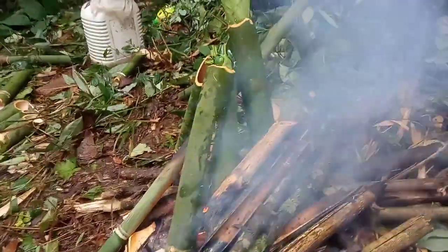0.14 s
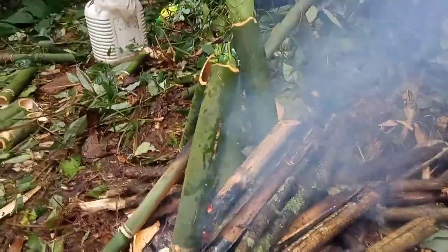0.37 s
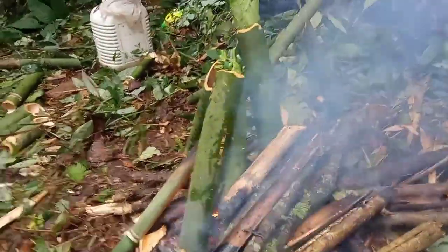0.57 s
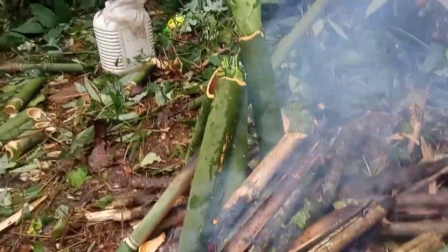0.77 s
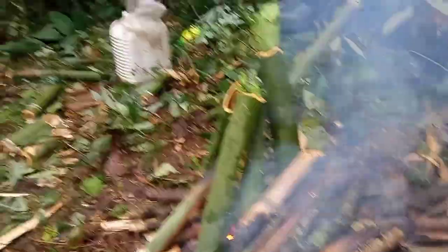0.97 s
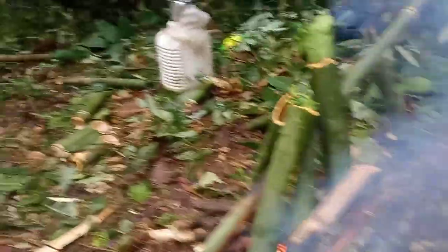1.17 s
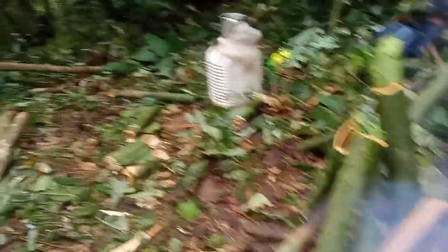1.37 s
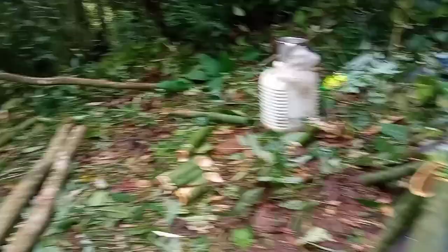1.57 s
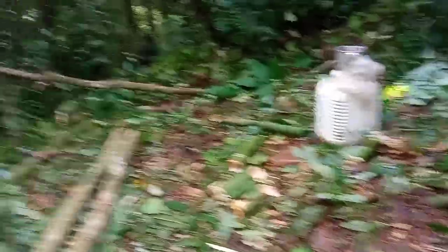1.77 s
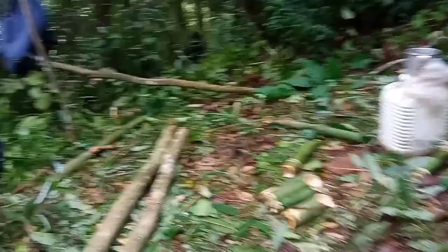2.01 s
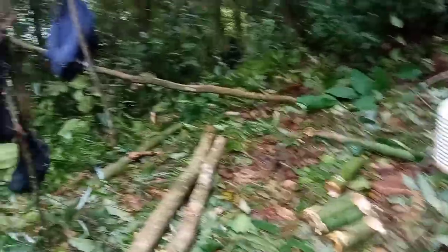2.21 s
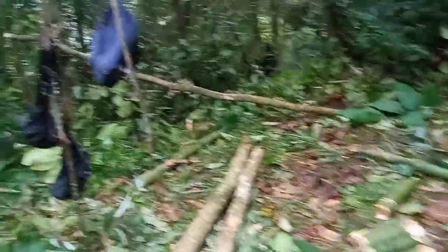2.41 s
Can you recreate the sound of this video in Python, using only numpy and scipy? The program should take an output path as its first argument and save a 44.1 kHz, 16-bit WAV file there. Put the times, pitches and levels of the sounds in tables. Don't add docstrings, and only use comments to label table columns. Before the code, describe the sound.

Bamboo pops loudly in a campfire twice, about a second apart, with short woodland echoes; soft hissing and low flame flutter continue, and smaller cracks, knocks and steam puffs crowd the end, close and slightly saturated.

```python
import sys
import numpy as np
from scipy import signal
from scipy.fft import rfft, irfft, next_fast_len
from scipy.io import wavfile
from scipy.ndimage import uniform_filter1d, map_coordinates

SR = 44100
rng = np.random.default_rng(int(sys.argv[2]) if len(sys.argv) > 2 else 0)


def put_to_file(sound):
    columns = np.atleast_2d(sound).T
    safe = np.clip(columns, -1, 1)
    whole_steps = np.round(safe * 32767)
    wavfile.write(sys.argv[1], SR, whole_steps.astype(np.int16))


def invert_db(level):
    return 10 ** (np.asarray(level, dtype=float) / 20)


N = 108045


def unit(x):
    return x / np.sqrt(np.mean(x ** 2) + 1e-20)


def along(points, hz):
    f, v = np.transpose(points)
    return np.interp(np.log(hz + 1), np.log(f + 1), v)


def wobble(rate):
    knots = rng.standard_normal(int(N * rate / SR) + 4)
    return map_coordinates(knots, [np.arange(N) * rate / SR])


def filtered(x, response):
    m = next_fast_len(len(x) + 8192)
    spectrum = rfft(x, m) * response(np.fft.rfftfreq(m, 1 / SR))
    return irfft(spectrum, m)[:len(x)]


def band(hz, octaves):
    return lambda f: np.exp(-(np.log2((f + 1) / hz) / octaves) ** 2)


def resonances(rows):
    def response(f):
        total = 0
        for k, (centre, width, db) in enumerate(rows):
            damping = 1j * f * width
            total = total + (-1) ** k * invert_db(db) * damping / (centre * centre - f * f + damping)
        return total
    return response


def turbulence(gain, size):
    return unit(filtered(rng.standard_normal(size), gain))


def even_noise(gain, size=N):
    x = turbulence(gain, size)
    envelope = np.abs(signal.hilbert(x))
    return unit(x / np.sqrt(envelope + .1))


def add(out, s, x):
    part = out[round(s * SR):][:len(x)]
    part += x[:len(part)]


def swell(rise_s, t60, size, bend=1):
    t = np.arange(size) / SR
    rise = np.sin(np.pi / 2 * np.clip(t / rise_s, 0, 1)) ** 2
    return rise * invert_db(-60 * (np.clip(t - rise_s, 0, None) / t60) ** bend)


def tail(size, longer):
    # f/Hz, t60/s
    forest_decay = [(200, 0.44), (800, 0.41), (2000, 0.47), (4000, 0.65), (8000, 0.63), (14000, 0.48)]
    hz, t, z = signal.stft(rng.standard_normal(size), SR, nperseg=256)
    t60 = longer * along(forest_decay, hz)[:, None]
    return signal.istft(z * invert_db(-60 * t / t60), SR, nperseg=256)[1][:size]


def gusts(rows, octaves, rough_db, bend, source):
    out, n = np.zeros(N), SR // 2
    rough = invert_db(rough_db * wobble(250))
    for s, db, hz, rise, t60 in rows:
        gust = source(band(hz, octaves), size=n) * swell(rise, t60, n, bend)
        add(out, s, invert_db(db) * gust)
    return out * rough


def rumble():
    # f/Hz, level/dB per Hz
    rumble_colour = [(20, -4), (50, -9), (85, -13), (400, -24.5), (1200, -82)]
    flutter = invert_db(-81.5 + 3 * wobble(14))
    return flutter * even_noise(lambda f: invert_db(along(rumble_colour, f)))


def sizzle():
    # t/s, level/dB
    strength = [(0, -58), (.1, -58), (.3, -58.5), (.55, -61.5), (.8, -58), (1.07, -63.5), (1.3, -54),
                (1.5, -52), (1.7, -50.5), (2.05, -50.5), (2.3, -54), (2.45, -57.5)]
    # f/Hz, level/dB per Hz
    near_colour = [(150, -28), (300, -9.5), (800, -18.5), (1650, -5), (2700, -13.5), (4450, -5), (9000, -9),
                   (15900, -20.5)]
    lull_colour = [(150, -22), (600, -14), (850, -19), (1400, -4.5), (1750, -5), (2640, -16.5), (4580, -3),
                   (15900, -17)]
    away_colour = [(150, -24), (500, -14.5), (900, -10), (1300, -5.5), (3500, -4.5), (6500, -7),
                   (15900, -19)]
    # f/Hz, width/octaves, level/dB
    hollow = (880, 0.34, -3.5)
    turn_s = (.72, .84, 1.1, 1.25)

    z = signal.stft(rng.standard_normal(N), nperseg=512)[2]
    patches = uniform_filter1d(uniform_filter1d(rng.standard_normal(z.shape), 6, 0), 12, 1)
    patchy = unit(signal.istft(z * invert_db(1.6 * unit(patches)), nperseg=512)[1][:N])

    crackles = (rng.random(N) < 400 / SR) * rng.standard_normal(N)
    crackles = crackles * invert_db(2.5 * np.clip(rng.exponential(size=N), 0, 2))
    raw = patchy + invert_db(-11) * unit(crackles)

    hz, octaves, depth_db = hollow
    cancelled = band(hz, octaves)

    def coloured(colour):
        return unit(filtered(raw, lambda f: invert_db(along(colour, f) + depth_db * cancelled(f))))

    near, lull, away = coloured(near_colour), coloured(lull_colour), coloured(away_colour)
    t = np.arange(N) / SR
    low = np.interp(t, turn_s, [0, 1, 1, 0])
    turn = np.interp(t, turn_s, [0, 0, 0, 1])
    level_db = np.interp(t, *np.transpose(strength)) + 0.5 * wobble(24.28)
    return invert_db(level_db) * ((1 - low - turn) * near + low * lull + turn * away)


def whistle():
    # level/dB, f/Hz, width/Hz, rise/s, t60/s
    tone = (-64, 478, 20, .04, .8)
    db, hz, width, rise, t60 = tone
    out = np.zeros(N)
    breath = even_noise(lambda f: 1 / (1 + ((f - hz) / width) ** 2), size=SR)
    add(out, .63, invert_db(db) * breath * swell(rise, t60, size=SR))
    return out


def puffs():
    # t/s, level/dB, centre f/Hz, rise/s, t60/s
    puff_rows = [(.02, -59, 3000, 0.047, 0.6), (.38, -54.5, 4400, 0.048, 0.16),
                 (.58, -64, 2580, 0.012, 0.87), (.67, -54, 3180, 0.03, 0.29),
                 (.695, -51, 13900, 0.01, 0.16), (1.396, -51, 1530, 0.0033, 0.22),
                 (1.545, -53, 2150, 0.0019, 0.034), (1.6, -53, 1450, 0.013, 0.45),
                 (1.545, -49.5, 6000, 0.00093, 0.028), (1.591, -53, 4450, 0.00092, 0.048),
                 (1.915, -56.5, 1770, 0.0077, 0.45), (2.08, -55, 1900, 0.017, .1),
                 (2.142, -43, 4870, 0.011, 0.053), (2.156, -46.5, 9100, 0.0045, 0.035),
                 (2.236, -45.5, 1360, 0.0015, 0.061), (2.395, -54.5, 4100, 0.0043, 0.21)]
    return gusts(puff_rows, octaves=1.2, rough_db=3, bend=1.38, source=turbulence)


def jet():
    # t/s, level/dB
    jet_strength = [(1.714, -70), (1.72, -47.5), (1.745, -45.5), (1.762, -41.5), (1.789, -39), (1.797, -43),
                    (1.812, -40), (1.835, -51), (1.89, -51.5)]
    # f/Hz, width/Hz, level/dB
    throat = [(950, 240, -3), (1450, 280, -1), (2470, 1350, 1), (4000, 800, 1.5), (4900, 600, 0.5),
              (6100, 1100, 0.5), (7900, 1200, -7)]
    spits = (rng.random(N) < 1500 / SR) * rng.standard_normal(N)
    source = rng.standard_normal(N) + invert_db(-5) * unit(spits)
    flow = unit(filtered(source, resonances(throat)))
    s, db = np.transpose(jet_strength)
    return flow * np.interp(np.arange(N) / SR, s, invert_db(db), 0, 0)


def thuds():
    # t/s, level/dB, centre f/Hz, t60/s
    thud_rows = [(0, -70.5, 440, 0.52), (0.133, -57, 75, 0.41), (0.126, -59.5, 330, 0.71),
                 (0.582, -71, 107, 0.49), (0.699, -56, 430, 0.28), (0.713, -75, 93, 0.26),
                 (.81, -73, 120, 0.22), (.88, -70, 90, 0.12), (.95, -75, 130, 0.57),
                 (1.092, -47.5, 258, 0.39), (1.101, -54.5, 82.6, 0.63), (1.47, -72, 82, 0.36),
                 (1.527, -66, 328, 0.27), (1.595, -49.5, 240, 0.26), (1.601, -52.5, 93, 0.34),
                 (1.749, -71, 132, 0.13), (1.88, -61.5, 112, 0.64), (1.591, -44.5, 600, 0.11),
                 (1.927, -48, 505, 0.076), (1.941, -43, 284, 0.16), (1.96, -55, 750, 0.41),
                 (1.944, -51, 95, 0.34), (2.029, -69, 170, 0.35), (2.105, -60.5, 161, 0.45),
                 (2.201, -40, 400, 0.15), (2.208, -58.5, 81, 0.21), (2.236, -48.5, 315, 0.15),
                 (2.282, -58, 89, 0.24)]
    rows = [(s, db, hz, 1.4 / hz, t60) for s, db, hz, t60 in thud_rows]
    return gusts(rows, octaves=0.71, rough_db=0.83, bend=0.94, source=even_noise)


def snaps():
    # t/s, peak level/dB, centre f/Hz
    snap_rows = [(0.696, -44.5, 2500), (1.3946, -45, 2504), (1.5915, -39, 4000), (1.862, -33.5, 2550),
                 (2.2344, -22, 2720), (1.0983, -16, 3630), (1.929, -39.5, 1900), (2.1525, -37, 7000),
                 (2.161, -38, 6400), (2.281, -40.5, 6800)]
    out = np.zeros(N)
    for s, db, hz in snap_rows:
        body = resonances([(hz, 1.4 * hz, 0)])
        step = filtered(np.arange(300) == 0, lambda f: body(f) ** 2)
        add(out, s, -invert_db(db) * step / np.abs(step).max())
    return out


def knocks():
    # t/s, peak level/dB, f/Hz, t60/s
    knock_rows = [(.6036, -56, 14500, 0.0069), (.625, -54, 2720, 0.018), (.698, -45.5, 1920, 0.014),
                  (0.712, -49.5, 430, 0.025), (0.7233, -41, 384, 0.0082), (0.9414, -49.5, 8530, 0.0062),
                  (1.0896, -31.5, 2364, 0.041), (1.2761, -43.5, 6250, 0.026), (1.3931, -39.5, 699, 0.028),
                  (1.399, -46, 1100, 0.044), (1.5455, -46, 8800, 0.004), (1.5452, -41.5, 5100, 0.0052),
                  (1.591, -35, 1063, 0.026), (1.5923, -34, 4060, 0.0034), (1.592, -36, 1630, 0.013),
                  (1.6065, -50, 1100, 0.01), (1.635, -43, 1690, 0.011), (1.7172, -44, 1420, 0.024),
                  (1.7185, -40.5, 2270, 0.01), (1.8611, -38, 1840, 0.0037), (1.9165, -43, 3560, 0.022),
                  (1.922, -41, 1810, 0.014), (1.9288, -26, 1770, 0.0051), (1.9292, -37.5, 3480, 0.017),
                  (1.932, -41, 1930, 0.03), (1.941, -39, 1190, 0.0088), (1.9555, -45, 1650, 0.024),
                  (2.0947, -48.5, 13100, 0.0086), (2.1361, -40.5, 3620, 0.0085), (2.1895, -37, 1240, 0.012),
                  (2.2032, -33.5, 274, 0.021), (2.2337, -36, 1744, 0.0082), (2.4005, -46.5, 2280, 0.02),
                  (2.405, -46, 4880, 0.0085)]
    out, t = np.zeros(N), np.arange(SR // 8) / SR
    for s, db, hz, t60 in knock_rows:
        drift = np.cumsum(rng.standard_normal(len(t))) * .0011 * np.sqrt(hz)
        ring = -np.sin(2 * np.pi * hz * t + drift) * swell(.1 * t60, t60, len(t), 1.15)
        click_db = -8 + 6.5 * np.log2(hz / 2000) - 60 * t / np.minimum(t60, .008)
        click = even_noise(band(hz, 0.99), size=len(t)) * invert_db(click_db)
        hit = invert_db(db) * (ring + click)
        room = tail(SR // 4, 0.35)
        add(out, s, hit)
        add(out, s + 0.0017, invert_db(-4.5) * signal.fftconvolve(hit, room / np.linalg.norm(room)))
    return out


def bursts():
    # t/s, peak level/dB
    tear_rows = [
        [(.1178, -25), (.1195, -19), (.1215, -13.5), (.1238, -13.5), (.1266, -14.5), (.1281, -15.5),
         (.1311, -18), (.1352, -24)],
        [(1.0933, -21), (1.0944, -14), (1.0963, -20), (1.0981, -17.5), (1.1005, -25.5), (1.1032, -27.5)],
    ]
    # f/Hz, width/Hz, level/dB
    stem_modes = [
        [(1840, 120, -9), (2200, 70, -4), (2365, 80, -3), (2760, 154, 9.5), (3140, 75, 0), (3380, 150, 3),
         (3850, 260, 0), (4940, 120, 0.5), (5640, 220, -3.5), (6350, 240, -3.5), (7780, 76, -9.5),
         (8480, 130, -5)],
        [(720, 100, -7), (1180, 77, 0.5), (1500, 170, 0), (2434, 275, 3), (2960, 280, 2), (3740, 210, -0.5),
         (4390, 110, -6), (6340, 470, -3), (6980, 110, -10), (8750, 370, -26)],
    ]
    # f/Hz, level/dB per Hz
    crack_colours = [
        [(200, -49.5), (800, -9), (3000, -14), (7000, -21), (15900, -30)],
        [(100, -17), (900, -7), (2500, -25), (6500, -8.5), (15900, -36.5)],
    ]
    crack_levels = [5.5, 1.5]
    # f/Hz, level/dB per Hz
    echo_colours = [
        [(88, -25), (150, -14.5), (800, -9), (2300, -2), (2690, -7), (3270, -2.5), (4060, -0.5), (15900, -23.5)],
        [(88, -43), (150, -24), (921, -3.5), (1040, -6), (1440, -2), (3680, -6), (15900, -19.5)],
    ]
    # t/s, level/dB
    echo_starts = [
        (.128, -31.5),
        (1.1, -32),
    ]

    out = np.zeros(N)
    rows = zip(tear_rows, stem_modes, crack_colours, crack_levels, echo_colours, echo_starts)
    for tears, stem, crack, crack_db, echo, (s, db) in rows:
        push = np.zeros(N)
        for at, peak_db in tears:
            rip = unit(rng.standard_normal(400) * swell(0.00019, 0.006, size=400))
            first_break = invert_db(23.5) * (np.arange(400) == 0)
            add(push, at, invert_db(peak_db) * (0.7 * rip + first_break))
        ringing = filtered(push, resonances(stem))
        raw_crack = filtered(push, lambda f: invert_db(along(crack, f)))
        burst = 1.043 * ringing + 0.36 * invert_db(crack_db) * raw_crack

        trunks = tail(SR, 1) * swell(.01, 99, size=SR)
        out += burst + invert_db(-19) * signal.fftconvolve(burst, trunks / np.linalg.norm(trunks))[:N]
        diffuse = tail(SR, 1) * swell(.008, 99, size=SR)
        colour = lambda f: invert_db(along(echo, f))
        steady_rms = np.std(filtered(rng.standard_normal(SR), colour))
        add(out, s, invert_db(db) * filtered(diffuse, colour) / steady_rms)
    return out


def scene():
    background = rumble() + sizzle()
    steam = whistle() + puffs() + jet()
    wood = thuds() + snaps() + knocks() + bursts()
    return (background + steam + wood)[None]


def band_limit(x):
    return signal.sosfilt(signal.butter(12, 16960, fs=SR, output="sos"), x)


def record(dry):
    # f/Hz, level/dB
    mic_response = [(30, -21), (60, 1.5), (9500, -2.5), (12500, -8), (13800, -15), (14600, 4), (15800, 1.5)]
    x = filtered(dry[0], lambda hz: invert_db(along(mic_response, hz)) * (hz < 15950))
    x = x / (1 + np.abs(x / .45) ** 3) ** (1 / 3)
    return band_limit(x[None])


dry = scene()
out = record(dry)
put_to_file(out)
```